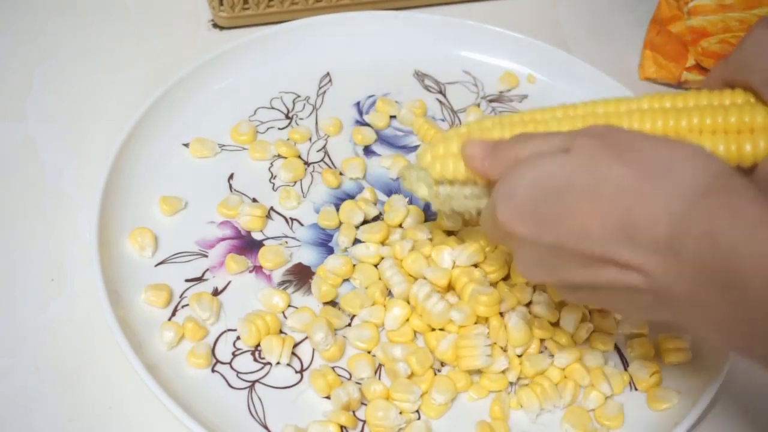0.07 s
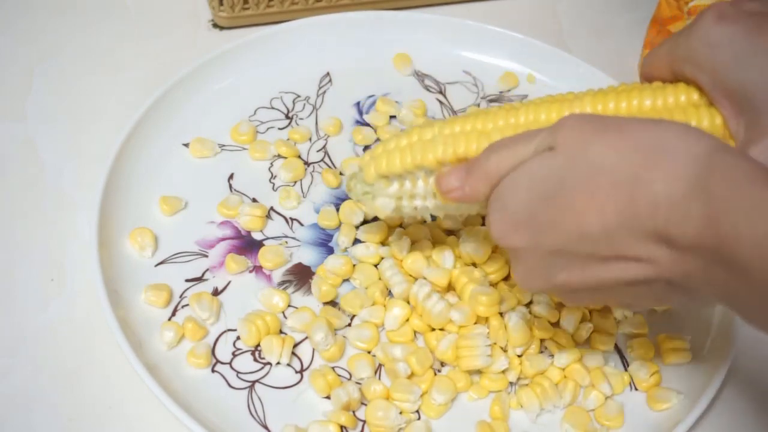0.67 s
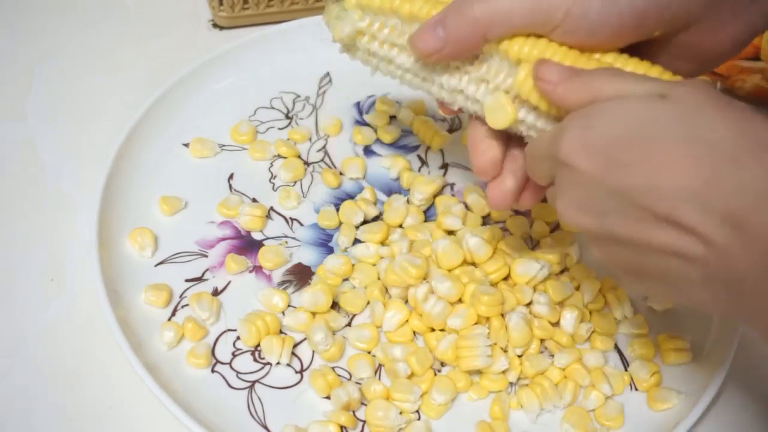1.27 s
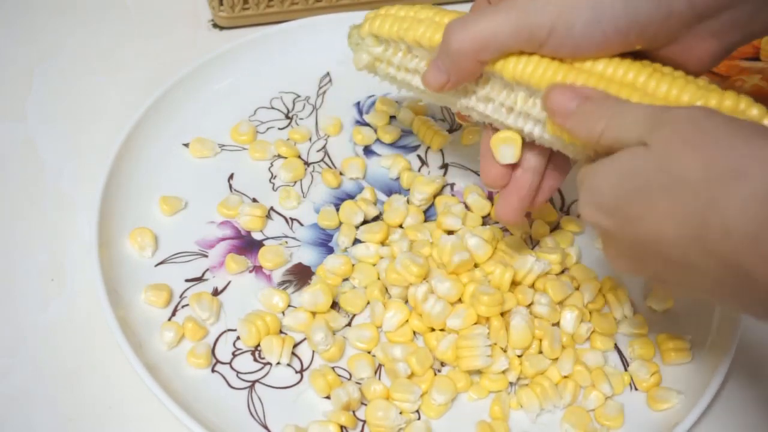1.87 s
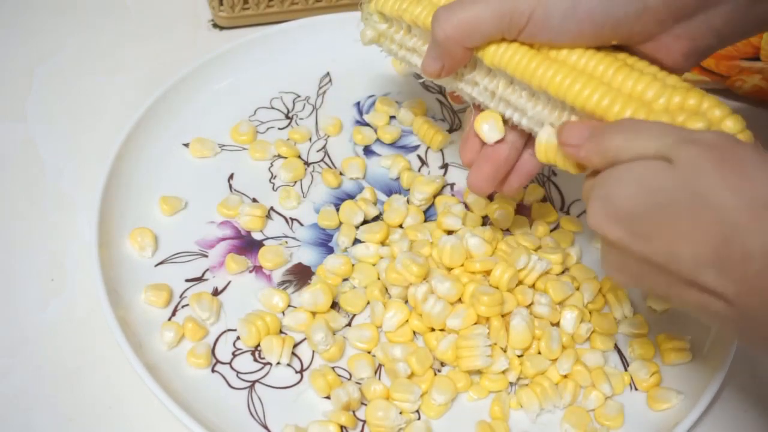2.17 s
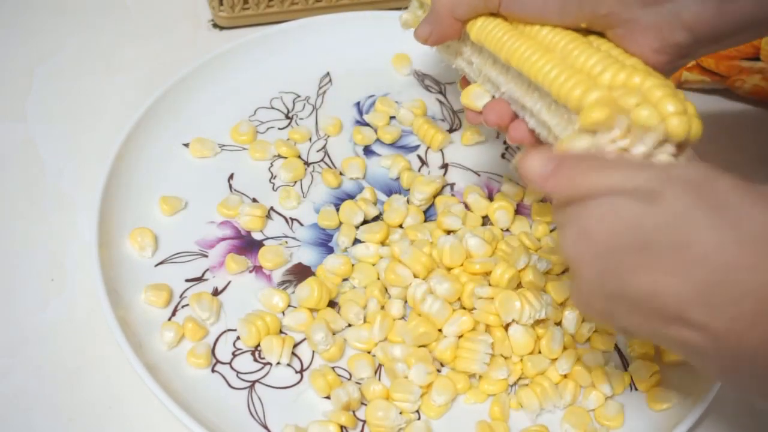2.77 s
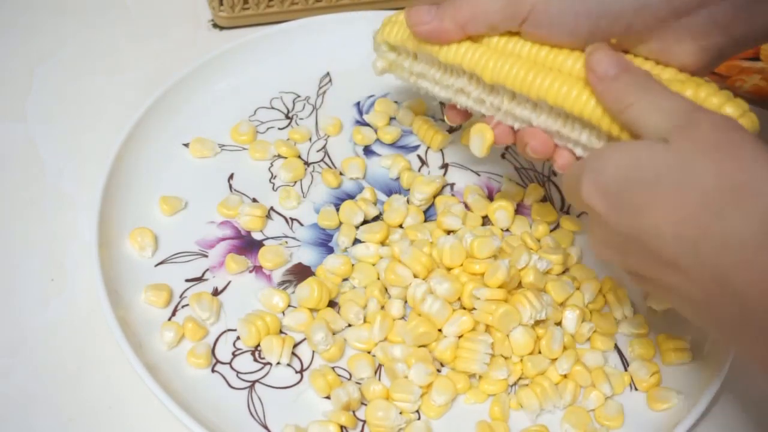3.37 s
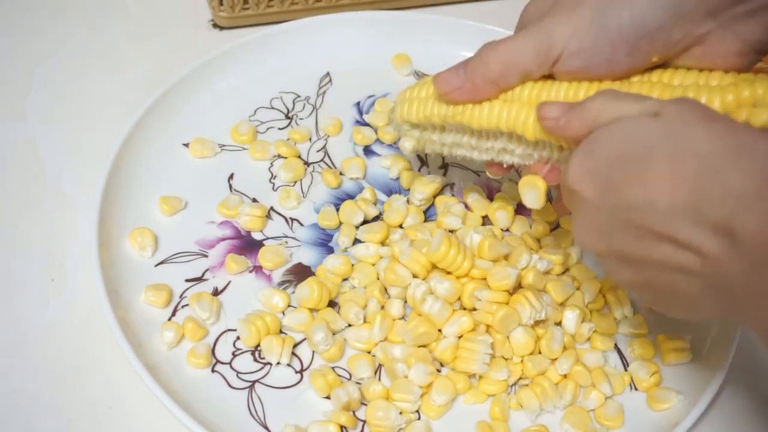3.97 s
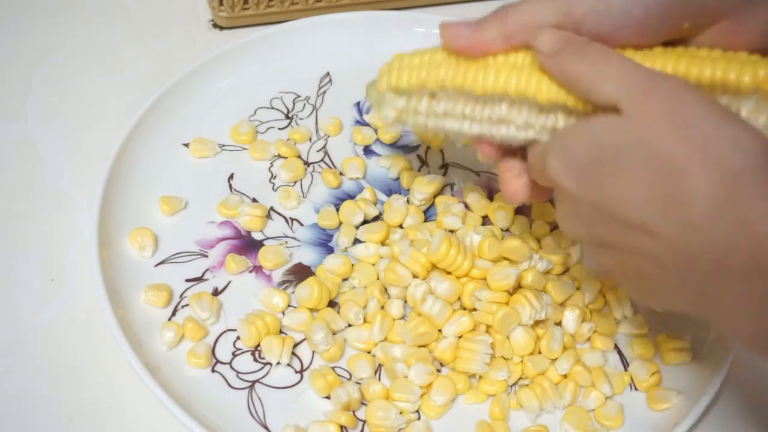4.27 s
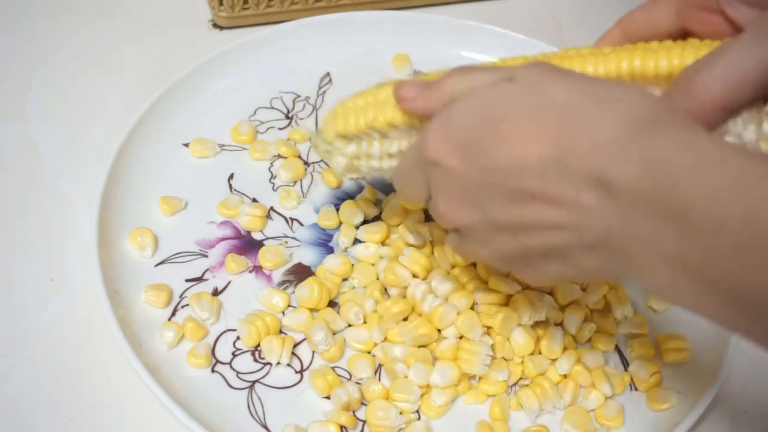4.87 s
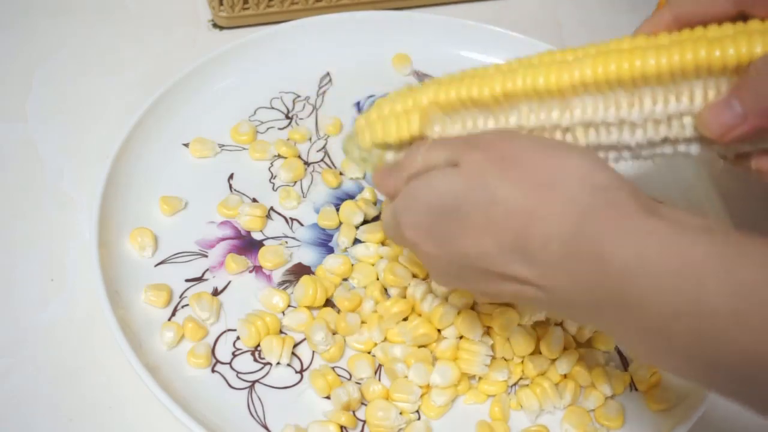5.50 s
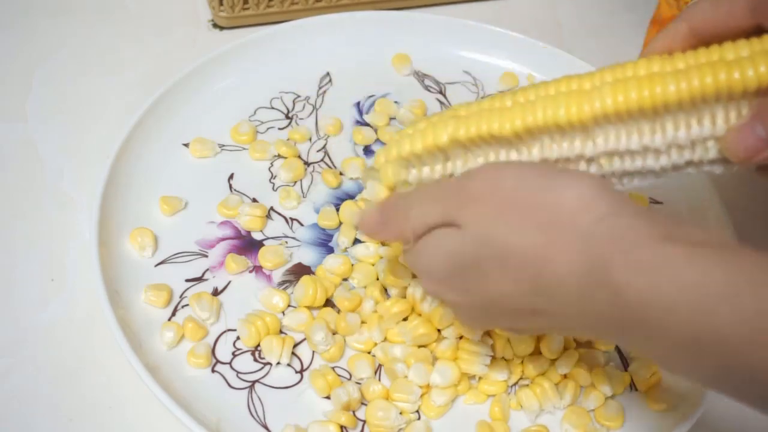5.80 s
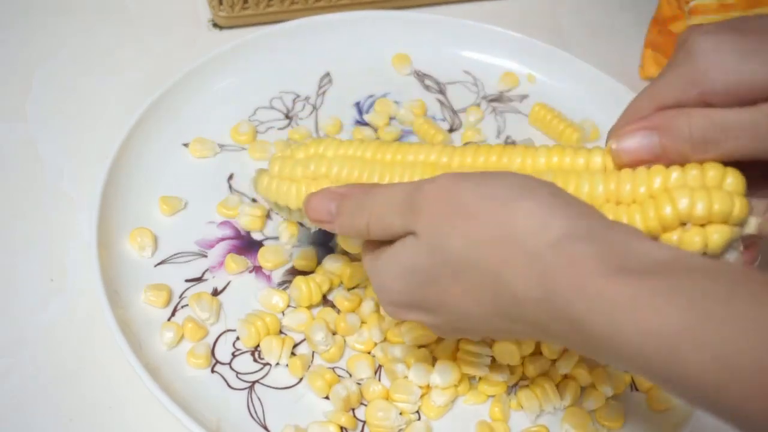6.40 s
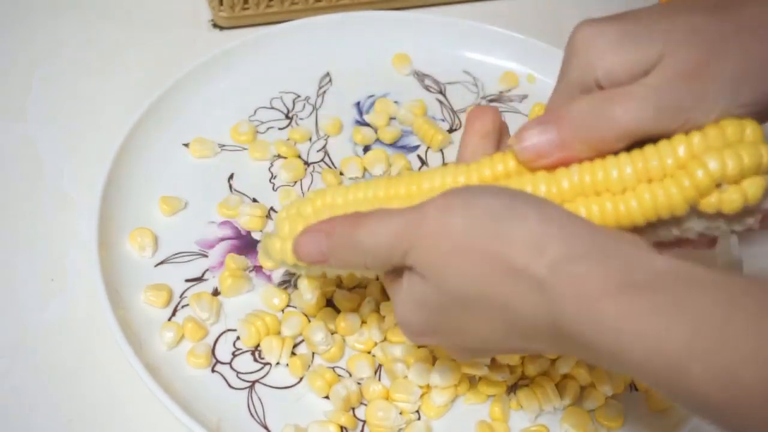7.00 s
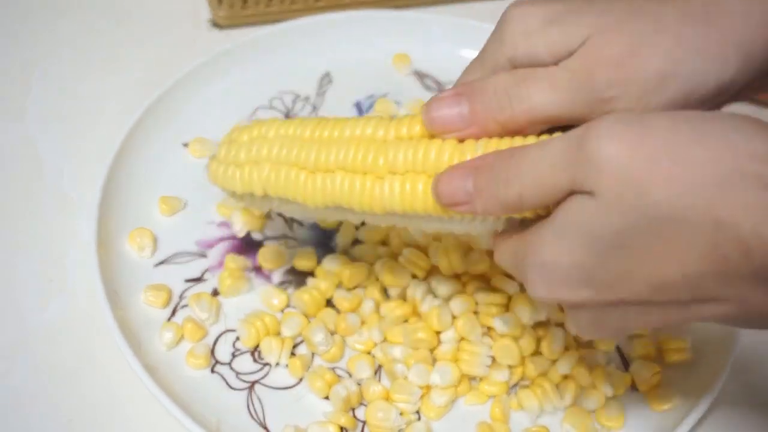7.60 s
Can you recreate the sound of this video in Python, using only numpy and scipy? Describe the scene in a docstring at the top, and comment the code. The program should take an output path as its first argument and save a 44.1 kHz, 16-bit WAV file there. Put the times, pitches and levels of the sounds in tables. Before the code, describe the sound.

Hands strip kernels from a fresh corn cob, close to the microphone in a small, hard kitchen. Throughout, a fan rushes with faint whistles, while skin rubs softly over the cob, fibres crackle and fingers give tiny squeaks. Kernels tear loose in short, wet bursts of cracks mixed with sharp pops, unevenly, a few times a second. Stronger snaps come around 0.4, 1.0, 1.6, 2.0, 2.5, 3.5, 4.4 to 4.5 and 5.1 seconds, with the sharpest pop near 6.8. Loose kernels land on a china plate with brief, damped ringing ticks, clearest at 0.6, 2.6, 4.8 and 5.4 seconds, with a small scatter near 6.2. The fan's rush dips abruptly at times, mostly at a snap, deepest around 2.8, 5.3 and 6.8 seconds, and creeps back. After 7.1 seconds, only light rubbing, crackle and faint ticks continue over the fan until about 7.7.

```python
"""A fan rushes in a small, hard kitchen while a hand, close up, rubs and crackles over a fresh corn cob.
Fibres pop, fingers squeak on the waxy skins, and a thumb snaps the kernels off in rows: each tears
loose in a wet burst of tiny cracks. Loose kernels tick onto a china plate, ringing its damped resonances.
The fan's rush dips abruptly now and then, mostly at a snap, and creeps back."""
import sys
import numpy as np
from scipy import signal
from scipy.fft import rfft, irfft, next_fast_len
from scipy.io import wavfile
from scipy.ndimage import uniform_filter1d, minimum_filter1d, map_coordinates

SR = 44100
rng = np.random.default_rng(int(sys.argv[2]) if len(sys.argv) > 2 else 0)


def log_audio(samples):
    """Write samples as a 16-bit WAV file to the path given in sys.argv[1]."""
    # one column per channel
    frames = np.atleast_2d(samples).T
    # limit to full scale, then quantise
    limited = np.clip(frames, -1, 1)
    pcm = np.round(limited * 32767).astype(np.int16)
    wavfile.write(sys.argv[1], SR, pcm)


N = 337365
TOP_HZ = 16000


def amp(db):
    return 10 ** (np.asarray(db) / 20)


def unit_rms(x):
    return x / np.sqrt(np.mean(x ** 2) + 1e-20)


def curve(points, hz):
    """Join (freq_hz, value) points along a log frequency axis."""
    freqs, values = np.transpose(points)
    return np.interp(np.log(hz + 1), np.log(freqs + 1), values)


def boosts(resonances, hz):
    """The dB that resonant peaks add to a spectrum."""
    return sum(db / (1 + (2 * (hz - centre) / width) ** 2) for centre, width, db in resonances)


def wobble(rate, n=N):
    """A smooth random curve with rate knots a second."""
    return map_coordinates(rng.standard_normal(int(n * rate / SR) + 4), [np.arange(n) * rate / SR])


def filtered(x, response):
    """Equalise x with the gain response(hz)."""
    n = x.shape[-1]
    padded = next_fast_len(n + 4096)
    return irfft(rfft(x, padded) * response(np.fft.rfftfreq(padded, 1 / SR)), padded)[..., :n]


def click(colour, size=512):
    """A minimum-phase pulse of energy 1, shaped by colour(hz) in dB."""
    cepstrum = irfft(np.log(amp(colour(np.fft.rfftfreq(size, 1 / SR))) + 1e-6))
    cepstrum[1:size // 2] *= 2
    cepstrum[size // 2 + 1:] = 0
    pulse = irfft(np.exp(rfft(cepstrum)))
    return pulse / np.linalg.norm(pulse)


def add(track, start_s, sound):
    part = track[..., max(0, round(start_s * SR)):][..., :sound.shape[-1]]
    part += sound[..., :part.shape[-1]]


def kitchen(sound, near_db, near_t60, room_db, room_t60):
    """Direct sound, quick reflections from plate, hands and table, then the walls."""
    t = np.arange(SR // 4) / SR

    def echoes(t60, gap_s, spread):
        noise = unit_rms(rng.standard_normal(len(t)) + spread * rng.standard_normal((2, len(t))))
        return noise * unit_rms(amp(-60 * t / t60) * (t > gap_s)) / np.sqrt(len(t))
    path = amp(near_db) * echoes(near_t60, gap_s=0.00068, spread=0.91)
    path += amp(room_db) * echoes(room_t60, gap_s=0.0032, spread=0.78)
    path[:, 0] += 1
    return signal.fftconvolve(sound[None], path, axes=1)


# Stereo image of the noise: freq_hz, left_right_correlation
CORRELATION = [(60, 0.17), (200, 0.45), (600, 0.71), (1400, 0.54), (3000, 0.31), (6000, 0.33), (15000, 0.1)]
def stereo_noise(colour):
    """Noise shaped by colour(hz) in dB, narrow in the mids and wide in the lows and highs."""
    angle = lambda hz: np.arccos(np.clip(curve(CORRELATION, hz), -1, 1)) / 2
    gains = lambda hz: amp(colour(hz)) * [np.cos(angle(hz)), np.sin(angle(hz))]
    mid, side = filtered(rng.standard_normal((2, N)), gains)
    return unit_rms(np.array([mid + side, mid - side]))


HISS_DIP_SHARE = 0.79  # hiss, whistles, rubbing and idle crackle dip less than the fan's body
# Dips in the background: start_s, depth_db
DIPS = [(0.08, 4), (1.05, 3.5), (1.29, 2), (1.99, 4.5), (2.774, 9), (3.25, 1), (3.98, 1.5), (4.52, 5),
        (5.11, 4), (5.33, 6), (6.771, 7.5), (7.0, 3.5), (7.2, 1)]
def dips(fall_s=0.0016, recover_s=0.34):
    """A level ride in dB: the background ducks quickly and recovers slowly."""
    t = np.arange(N) / SR
    since = lambda s: np.maximum(t - s, 0)
    return -sum(db * np.minimum(since(s) / fall_s, 1) * np.exp(-since(s) / recover_s) for s, db in DIPS)


# Tone of the rushing air: freq_hz, gain_db
AIR_EQ = [(180, -59), (300, -27), (494, -26.5), (930, -8.5), (1320, -7.5), (1430, -3.5), (1750, -10),
          (2650, -4), (3290, -1), (4590, -7.5), (7080, -5.5), (8360, -15), (12300, -15), (13800, -14),
          (16000, -24)]
# Resonances of the fan housing: centre_hz, width_hz, boost_db
HOUSING = [(721.4, 125, 7), (1086, 27, 7), (1422, 54, 7.5), (1860, 25, 6), (2000, 19, 5.5), (2273, 63, 9.5),
           (2420, 45, 5.5), (2515, 43, 6.5), (2718, 73, 10), (2970, 20, 3.5), (2998, 29, 7),
           (3186, 25, 6.5), (3407, 67, 7), (3764, 44, 5.5), (6250, 78, 3.5), (7180, 220, 3)]
# Motor whine: pitch_hz, level_db
WHINE = [(947, -58.5), (1217, -59)]
# Tone of the room's rumble: freq_hz, gain_db
RUMBLE_EQ = [(20, 2.5), (70, -1.5), (140, 3.5), (300, 1), (500, 3), (900, -29)]
def fan(split_hz=1800, body_db=-42.5, hiss_db=-33, rumble_db=-73, ripple_db=3.5):
    """Air rushes through the resonant housing over a thin motor whine and a low rumble."""
    t, dip_db = np.arange(N) / SR, dips()
    # Standing waves in the room ripple the air's tone.
    standing, grid_hz = rng.standard_normal(500), np.linspace(0, SR / 2, 500)
    ripple = lambda hz: ripple_db * np.interp(hz, grid_hz, standing) * np.clip(hz / 6000, 0, 1)
    colour = lambda hz: curve(AIR_EQ, hz) + ripple(hz) + boosts(HOUSING, hz)
    body = stereo_noise(lambda hz: colour(hz) - 10 * np.log10(1 + (hz / split_hz) ** 8))
    hiss = stereo_noise(lambda hz: colour(hz) - 10 * np.log10(1 + (split_hz / (hz + 1)) ** 8))
    whine = np.zeros(N)
    for hz, db in WHINE:
        swell = amp(db + 6.8 * np.tanh(wobble(15)))
        whine += swell * np.sqrt(2) * np.sin(2 * np.pi * hz * t + wobble(30))
    body *= amp(body_db + dip_db + wobble(15))
    hiss *= amp(hiss_db + HISS_DIP_SHARE * dip_db + wobble(16))
    rumble = amp(rumble_db + 2.1 * wobble(10)) * stereo_noise(lambda hz: curve(RUMBLE_EQ, hz))
    return body + hiss + amp(dip_db - dip_db.mean()) * (whine + rumble)


# Whistles in the rush: pitch_hz, level_db, wander_ratio
WHISTLES = [(1418, -58, 0.007), (2688, -51.3, 0.005), (3375, -58.5, 0.012)]
def whistles(swell_db=10, hoarse_rad=0.29):
    """Hoarse whistles flare up briefly, each wandering in pitch on its own."""
    out = np.zeros(N)
    for hz, db, wander in WHISTLES:
        phase = 2 * np.pi * np.cumsum(hz * (1 + wander * wobble(35))) / SR + hoarse_rad * wobble(260)
        out += amp(db) * unit_rms(np.sin(phase) * amp(swell_db * np.tanh(wobble(24))))
    return amp(HISS_DIP_SHARE * dips()) * out


# How hard the palm slides over the cob: time_s, level_db
SLIDE = [(0, -42), (0.7, -43.5), (0.9, -48), (1.5, -44.5), (2.1, -44.5), (2.7, -35.5), (2.95, -59),
         (3.25, -37.5), (3.7, -47), (3.92, -46), (4.05, -44.5), (4.4, -45), (4.6, -52), (5.0, -43),
         (5.5, -40.5), (5.85, -49), (6.3, -47), (6.6, -39.5), (6.75, -46), (6.85, -45), (7.3, -53),
         (7.65, -36.5)]
def rubbing(width_hz=520, low_cut_hz=800, swell_db=5.5, grip_db=7.5, grip_s=0.063):
    """Patches of skin slide over waxy kernels, each swelling on its own; the grip builds to each snap."""
    t, snap_s = np.arange(N) / SR, np.array(SNAPS)[:, 0]
    until_snap_s = np.append(snap_s, np.inf)[np.searchsorted(snap_s, t)] - t
    level_db = np.interp(t, *np.transpose(SLIDE)) + HISS_DIP_SHARE * dips()
    level_db += grip_db * np.exp(-until_snap_s / grip_s)
    low_cut = lambda hz: -20 * np.log10(1 + (low_cut_hz / (hz + 1)) ** 4)
    friction = np.zeros((2, N))
    for centre_hz, db in [(1550, -6), (2450, 3.5), (3000, 2), (3700, 3)]:
        band = lambda hz: low_cut(hz) - 20 * np.log10(1 + ((hz - centre_hz) / width_hz) ** 2)
        friction += stereo_noise(band) * amp(db + swell_db * np.tanh(wobble(22)))
    return amp(level_db) * unit_rms(friction)


def cracks(n, per_s, scatter_db):
    """Cells burst at random moments, with random sizes."""
    bursts = rng.random(n) < per_s / SR
    return bursts * amp(scatter_db * np.clip(rng.standard_normal(n), -2, 2)) * rng.choice([-1, 1], n)


# Tone of a tearing cell: freq_hz, gain_db
TEAR_EQ = [(100, -42), (500, -24), (1200, -12), (3000, -7), (4500, 1.5), (6300, 3), (8500, -1.5),
           (11000, -1), (14000, 1), (16000, -3.5)]
def tear(bright_db=0, edge_hz=6000, shelf_db=10):
    """One bursting cell: a click that is weak below its edge; a smaller tear has a higher edge."""
    tilt = lambda hz: bright_db * np.clip(np.log2((hz + 1) / 9000), -1, 1)
    cuts = lambda hz: shelf_db / (1 + (hz / edge_hz) ** 10) + 30 * (hz > TOP_HZ + 900)
    return click(lambda hz: curve(TEAR_EQ, hz) + tilt(hz) - cuts(hz))


def crackle(reach_s=0.039, busy_db=-44, idle_db=-51):
    """Juice and fibres tick faintly under the thumb, loudest around the snaps."""
    coarse_t = np.arange(0, N, 100) / SR
    nearness = np.exp(-np.abs(coarse_t - np.array(SNAPS)[:, :1]) / reach_s).sum(axis=0)
    pressure = np.interp(np.arange(N) / SR, coarse_t, np.tanh(nearness))
    pulses = cracks(N, per_s=300, scatter_db=6) * amp(0.5 * np.tanh(wobble(14)))
    ticks = signal.fftconvolve(pulses, tear())
    wet = kitchen(ticks, near_db=-7, near_t60=0.027, room_db=2, room_t60=0.12)
    return (amp(idle_db + HISS_DIP_SHARE * dips()) + amp(busy_db) * pressure) * unit_rms(wet[:, :N])


# The thumb ploughs along a row: start_s, length_s, relative_db
PEELS = [(-0.04, 0.097, -39), (0.29, 0.11, -39), (0.618, 0.042, -37), (0.96, 0.054, -32.5),
         (1.28, 0.17, -39), (2.273, 0.081, -31.5), (2.659, 0.08, -36), (2.747, 0.062, -33),
         (2.982, 0.083, -33.5), (3.122, 0.17, -42), (3.467, 0.044, -32), (3.584, 0.12, -38.5),
         (4.057, 0.14, -34.5), (4.378, 0.2, -44), (4.634, 0.064, -42), (4.916, 0.054, -34),
         (5.032, 0.067, -35.5), (5.51, 0.038, -37), (5.763, .022, -34), (6.741, 0.032, -43),
         (6.917, 0.19, -41.5), (7.599, .07, -43)]
def peels(fray_s=0.06, fray_db=-18.5, uneven_db=2.5, gain_db=-2.5):
    """Small tears swell and die away under the sliding thumb, and as fibres fray around each snap."""
    frays = [(snap_s - fray_s / 2, fray_s, db + fray_db) for snap_s, db, *_ in SNAPS]
    pulses = np.zeros(N)
    for start_s, length_s, db in PEELS + frays:
        n = int(length_s * SR)
        run = cracks(n, per_s=520, scatter_db=7.5) * amp(uneven_db * wobble(123, n))
        add(pulses, start_s, amp(db) * np.hanning(n) ** 0.5 * unit_rms(run))
    tears = signal.fftconvolve(pulses, tear())
    return amp(gain_db) * kitchen(tears, near_db=4, near_t60=0.013, room_db=1, room_t60=0.105)[:, :N]


# Fibres breaking: start_s, relative_db
POPS = [(0.0098, -11), (0.0503, -12), (0.0803, -14), (0.3097, -17), (0.71, -12.5), (0.7421, -9),
        (0.756, -10), (0.7765, -12), (0.9752, -14), (0.986, -15.5), (1.3199, -21), (1.3416, -20.5),
        (1.3656, -12.5), (1.3905, -10), (1.409, -8), (1.4356, -15), (1.6347, -9.5), (1.978, -5.5),
        (2.2135, -14), (2.28, -11), (2.4785, -6), (2.7722, -20), (3.017, -12.5), (3.0278, -24),
        (3.0974, -18), (3.1672, -17), (3.471, -15.5), (3.503, -9), (3.5479, -8), (3.6812, -22),
        (3.9964, -24), (4.096, -10), (4.1294, -25), (4.3854, -6.5), (4.4187, -7), (4.455, -16),
        (4.4778, -8.5), (4.498, -10), (4.861, -6.5), (4.9459, -23), (4.9704, -12), (5.0562, -13),
        (5.0812, -10), (5.5254, -18), (6.3907, -7.5), (6.4452, -15), (6.733, -20), (6.7611, -1),
        (6.7748, -4.5), (6.9804, -28), (6.9909, -22), (7.0171, -13), (7.0351, -14), (7.094, -18),
        (7.1008, -21)]
def pops(gain_db=5.5):
    """A single fibre breaks with one sharp click."""
    out = np.zeros((2, N))
    for start_s, db in POPS:
        pop = tear(bright_db=3 + 3.5 * rng.uniform(-1.1, 1), edge_hz=6300)
        wet = kitchen(pop, near_db=-1.5, near_t60=0.012, room_db=-5.5, room_t60=0.098)
        add(out, start_s, amp(db + gain_db) * wet)
    return out


# Fingers slipping on the skins: start_s, length_s, pitch_hz, relative_db
SQUEAKS = [(0.388, 0.069, 3249, -41), (1.013, 0.012, 3194, -34.5), (3.167, 0.04, 2686, -41),
           (3.497, 0.045, 2700, -43.5), (3.755, 0.022, 2676, -41), (3.863, 0.1, 2230, -43.5),
           (3.879, 0.084, 3320, -42), (4.397, 0.049, 2700, -36), (4.467, 0.026, 2700, -39.5),
           (5.043, 0.035, 2720, -35.5), (5.262, 0.029, 1402, -43), (6.557, 0.054, 2700, -41),
           (6.666, 0.029, 2708, -33.5)]
def squeaks(waver=0.055, rough_db=3, octave_db=-14, gain_db=3):
    """Skin sticks and slips on a kernel, hoarsely and at an unsteady pitch."""
    out = np.zeros((2, N))
    for start_s, length_s, hz, db in SQUEAKS:
        n = int(length_s * SR)
        phase = 2 * np.pi * np.cumsum(hz * (1 + waver * wobble(1086, n))) / SR
        tone = np.sin(phase) + amp(octave_db) * np.sin(2 * phase)
        slip = unit_rms(tone * amp(rough_db * wobble(387, n))) * np.hanning(n) ** 0.5
        wet = kitchen(slip, near_db=-4, near_t60=0.029, room_db=2.5, room_t60=0.05)
        add(out, start_s, amp(db + gain_db) * wet)
    return out


# Kernels tearing loose: start_s, relative_db, length_s, bright_db, edge_hz
SNAPS = [(0.428, -18, 0.011, 2, 4800), (0.736, -22.5, 0.036, 2.5, 4760), (0.988, -28, 0.0037, -3, 6000),
         (1.035, -16.5, 0.012, 3.5, 4400), (1.316, -23, 0.0074, -6, 6400), (1.622, -18.5, 0.008, 1, 6340),
         (1.637, -21.5, 0.016, 1.5, 6500), (1.737, -28, 0.043, 0, 7500), (1.982, -16.5, 0.016, -3, 6200),
         (2.213, -21, 0.0037, -1, 6000), (2.261, -23.5, 0.0098, -2, 5970), (2.279, -24.5, 0.019, 1, 6500),
         (2.452, -14.5, 0.0023, 10, 5830), (2.485, -21.5, 0.0094, 7, 6500), (2.834, -22.5, 0.0063, 3, 5460),
         (3.488, -24, 0.0042, 2.5, 5500), (3.531, -17.5, 0.0047, 2, 5850),
         (3.7005, -19.5, 0.011, 4.5, 5030), (3.992, -26, 0.0069, 2, 6000), (4.398, -21.5, 0.009, 0, 5300),
         (4.5044, -14.5, 0.0025, -2, 4200), (4.509, -20.5, 0.013, 1.5, 4180), (4.86, -26, 0.0092, -5, 5500),
         (4.959, -24, 0.003, 13, 6000), (5.1, -15.5, 0.013, 1.5, 5200), (5.324, -19.5, 0.0091, 0.5, 5270),
         (5.541, -26.5, 0.00329, -19, 5030), (5.785, -19, 0.0045, 2.5, 5600),
         (6.002, -29.5, 0.0073, -2, 5000), (6.318, -23, 0.021, -1, 5200), (6.394, -22.5, 0.017, 1.5, 5200),
         (6.7405, -17.5, 0.0031, -5, 5030), (6.767, -25, 0.011, 8, 5500), (6.948, -23, 0.004, 3, 5500)]
def snaps(cracks_per_s=1600, scatter_db=6, sag_db=-4, strain_s=0.007, strain_db=-13, gain_db=-2.5):
    """A kernel's stalk crackles under strain, then gives: its cells burst in a ragged, weakening run."""
    out = np.zeros((2, N))
    lead = int(strain_s * SR)
    for start_s, db, length_s, bright_db, edge_hz in SNAPS:
        n = max(8, int(length_s * SR))
        run = cracks(n, cracks_per_s, scatter_db)
        run[0] = 1
        run = unit_rms(run * amp(sag_db * np.arange(n) / n + 1.5 * wobble(340, n)))
        strain = unit_rms(cracks(lead, cracks_per_s, scatter_db) * np.linspace(0, 1, lead))
        pulses = np.concatenate([amp(strain_db) * strain, run])
        cell = amp(db + gain_db) * tear(bright_db, edge_hz)
        # The cracks fall on four spots, each with its own reflections.
        spots = rng.integers(4, size=len(pulses))
        for spot in range(4):
            burst = np.convolve(pulses * (spots == spot), cell)
            wet = kitchen(burst, near_db=-1.5, near_t60=0.016, room_db=-6.5, room_t60=0.16)
            add(out, start_s - lead / SR, wet)
    return out


# The cob jolts in the hand: start_s, peak_db
JOLTS = [(0.426, -47), (4.502, -47), (6.775, -42)]
def jolts(rise_s=0.00029):
    """As a row gives way, the cob gives the palm one short, dull push."""
    out, age = np.zeros(N), np.arange(SR // 50) / SR / rise_s
    for start_s, db in JOLTS:
        add(out, start_s, amp(db) * age * np.exp(1 - age))
    return out


# Tone of a landing kernel: freq_hz, gain_db
CONTACT_EQ = [(100, -54), (450, -15), (950, -6), (1350, 1.5), (2200, -1), (3000, -2.5), (4400, 1.5),
              (5600, -1.5), (7000, 1), (10000, -4.5), (16000, -13)]
# Damped resonances of the loaded plate: centre_hz, width_hz, boost_db
PLATE = [(1497, 156, 8), (1800, 51, 5), (1987, 58, 11.5), (2415, 31, 11.5), (2824, 72, 13),
         (3380, 140, 4.5), (4305, 84, 6.5), (5580, 110, 7)]
# Kernels landing: start_s, relative_db, pitch_hz
DROPS = [(0.555, -30, 1700), (0.596, -20, 3000), (0.6, -14.5, 3320), (0.638, -31, 1700),
         (0.7986, -29.5, 2090), (0.951, -29.5, 1800), (0.9614, -27, 1800), (1.2074, -21, 1650),
         (1.235, -27.5, 2800), (1.883, -27, 2030), (2.124, -29.5, 2550), (2.149, -33, 1800),
         (2.411, -28.5, 2380), (2.441, -29, 3300), (2.609, -15, 2480), (2.626, -11.5, 3250),
         (4.7491, -22, 1715), (4.7622, -20.5, 1650), (4.7921, -23.5, 1800), (4.856, -17.5, 1300),
         (4.88, -20, 2850), (4.9125, -25.5, 2820), (4.9258, -25.5, 2900), (5.435, -17, 2800),
         (5.8936, -29.5, 2200), (5.9155, -25.5, 2900), (6.1339, -18, 2670), (6.1438, -21.5, 1950),
         (6.1532, -20, 2000), (6.1705, -15.5, 2520), (6.179, -21, 4500), (6.1934, -16.5, 3200),
         (6.6777, -19, 3270), (6.716, -26.5, 1850), (7.411, -28, 1970), (7.452, -29.5, 1800)]
def drops(skirt_db=8, gain_db=20):
    """A soft kernel lands on the plate with one short, ringing tick, each at its own pitch."""
    out = np.zeros((2, N))
    for start_s, db, pitch_hz in DROPS:
        skirts = lambda hz: skirt_db * np.log1p(2 * np.log2((hz + 1) / pitch_hz) ** 2)
        knock = click(lambda hz: curve(CONTACT_EQ, hz) - skirts(hz) + boosts(PLATE, hz), size=2048)
        wet = kitchen(knock, near_db=-2, near_t60=0.019, room_db=-6.5, room_t60=0.13)
        add(out, start_s, amp(db + gain_db) * wet)
    return out


def scene():
    """Corn and hands up front, over the bed of the fan."""
    corn = snaps() + pops() + peels() + drops() + squeaks() + crackle() + rubbing() + jolts()
    return corn + fan() + whistles()


def limiter(x, ceiling=0.89, span=SR // 500):
    """A fast limiter holds the sharpest cracks just under full scale."""
    gain = ceiling / np.maximum(np.abs(x).max(axis=0), ceiling)
    return x * uniform_filter1d(minimum_filter1d(gain, 2 * span), span)


# Balance between the two microphone ports: freq_hz, left_louder_db
BALANCE = [(500, .3), (1300, 0.5), (2600, 3), (5500, 2.1), (9000, 1.7), (13000, 3.2)]
# Phase between the ports: freq_hz, left_lag_rad
LAG = [(100, 0.081), (700, 0.31), (3000, 0.82), (8000, 1), (15000, 1.24)]
def record(dry):
    """The left port hears a little later and brighter; peaks are limited and the very top is cut."""
    ports = np.array([[0.5], [-0.5]])
    response = lambda hz: amp(ports * curve(BALANCE, hz)) * np.exp(-1j * ports * curve(LAG, hz))
    return filtered(limiter(filtered(dry, response)), lambda hz: hz < TOP_HZ)


dry = scene()
out = record(dry)
log_audio(out)
```